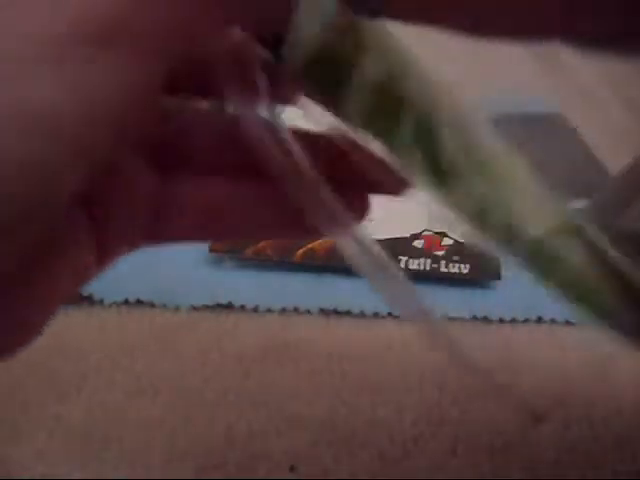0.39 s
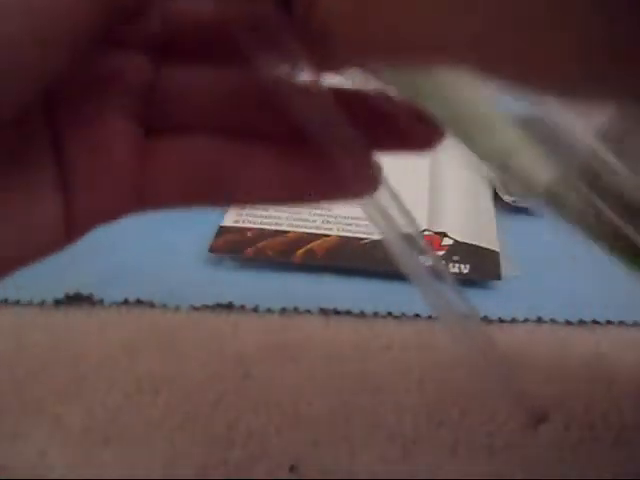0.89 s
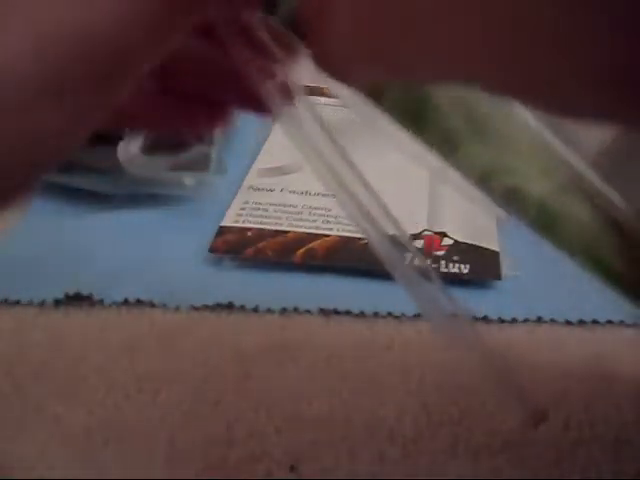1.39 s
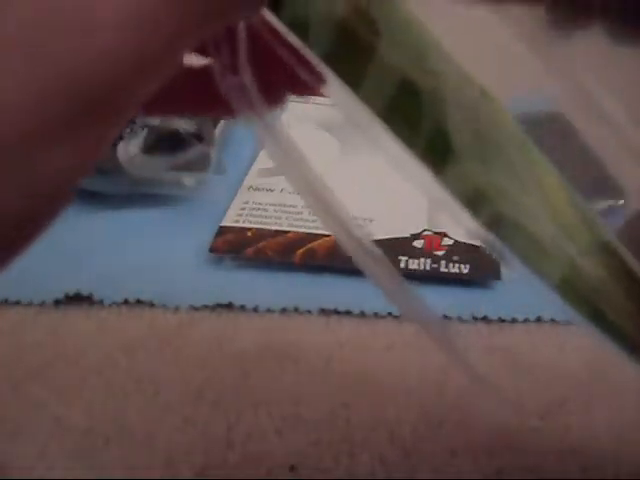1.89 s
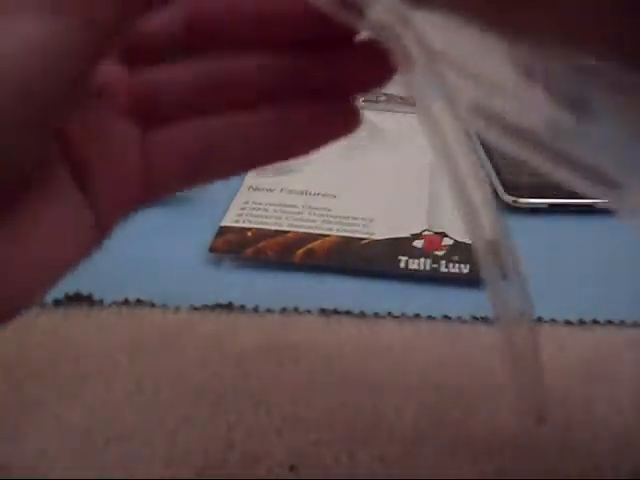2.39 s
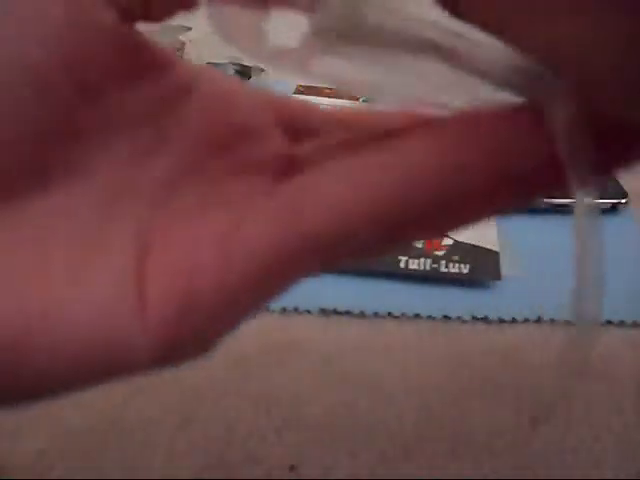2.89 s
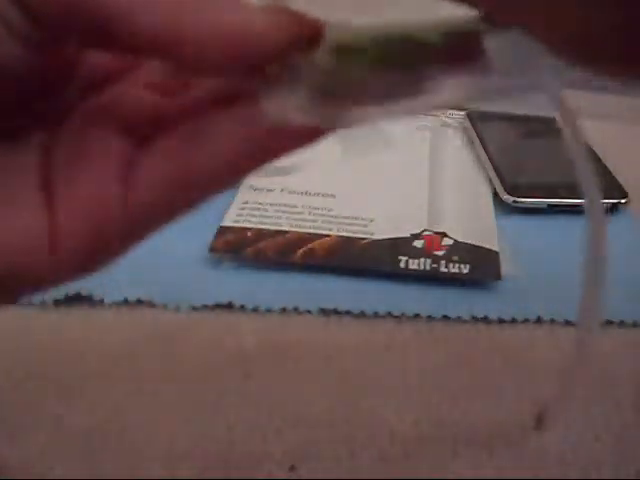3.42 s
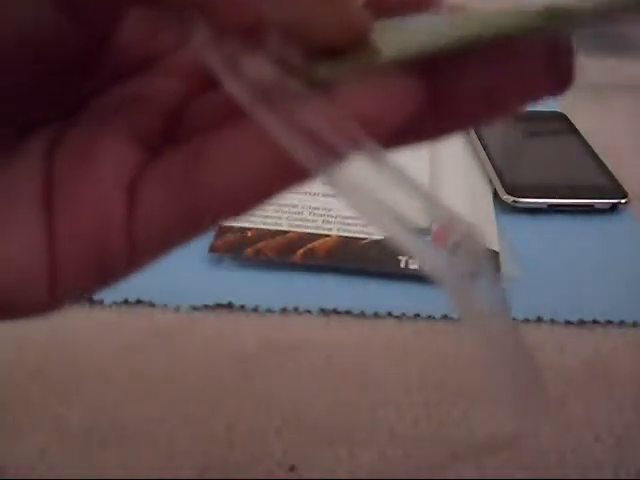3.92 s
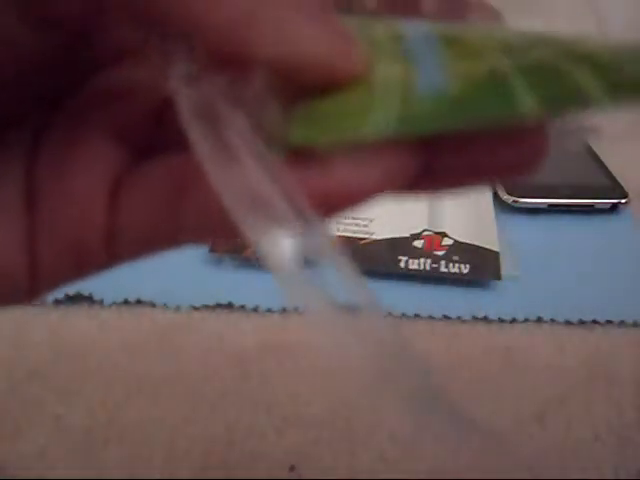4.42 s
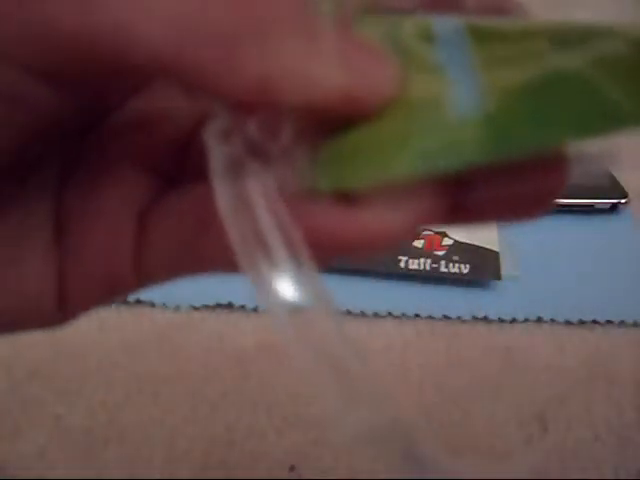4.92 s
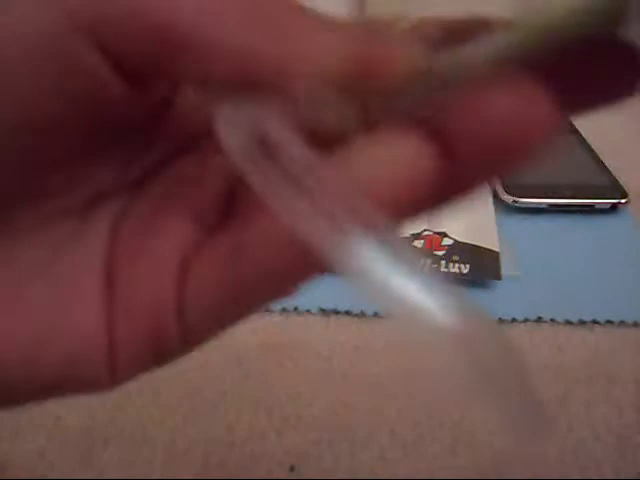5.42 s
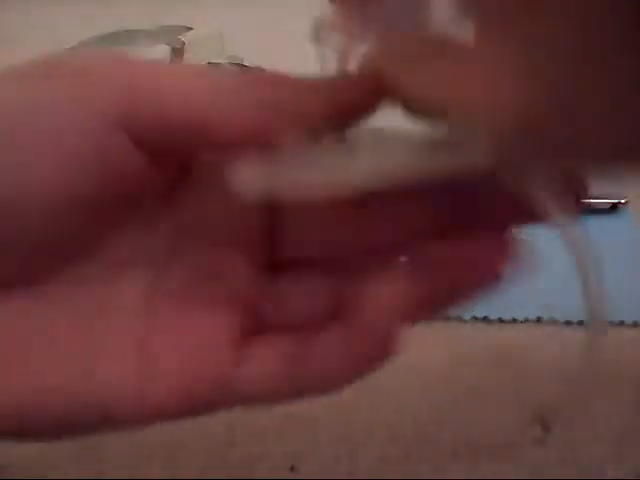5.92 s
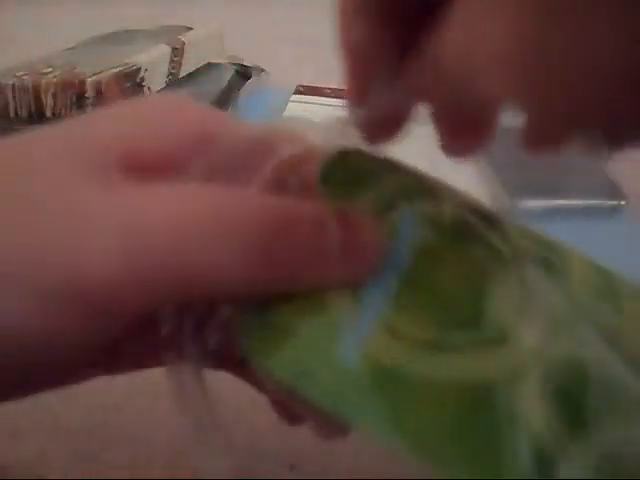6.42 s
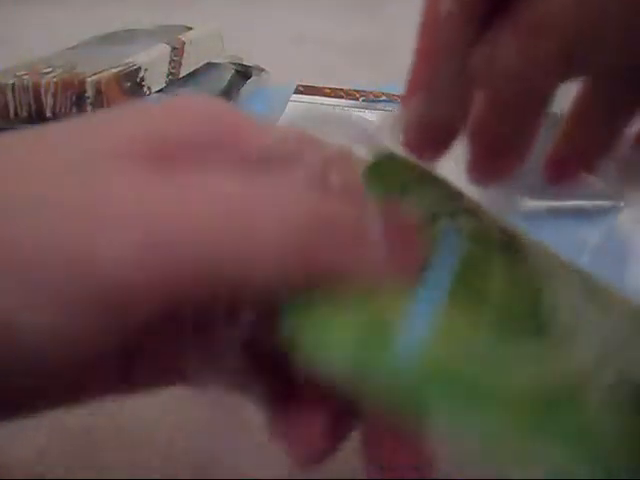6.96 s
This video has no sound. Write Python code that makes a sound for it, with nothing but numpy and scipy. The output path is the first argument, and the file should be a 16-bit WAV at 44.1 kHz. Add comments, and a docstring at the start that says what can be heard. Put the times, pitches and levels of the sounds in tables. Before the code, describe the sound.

Hard clear plastic packaging is bent and pulled apart by hand, very close to a cheap microphone in a small carpeted room. Light clicks and dull pops come in loose clusters with soft rustling, then crowd together. A tiny quickening creak leads to a loud snap near the end, followed by a short rattle, another strong pop and a few lesser ticks. Hiss, low rumble and a faint high whine stay beneath.

```python
"""Hands bend and pull apart a stiff clear plastic shell, close by in a quiet carpeted room.
The sheet buckles in clicks and dull pops, creaks, and snaps open: short jerks set its modes ringing.
Rustle, brief rubs and a rattle after the snap drive the same modes with small ticks; dying noise is the room.
Below lie the microphone's hiss and rumble (shaped noise) and a thin whine (sines in a narrow noise band).
Gain control ducks after loud peaks, most of all after the loud snap."""
import sys
import numpy as np
from scipy import signal
from scipy.fft import rfft, irfft
from scipy.io import wavfile
from scipy.ndimage import uniform_filter1d

SR = 44100
rng = np.random.default_rng(int(sys.argv[2]) if len(sys.argv) > 2 else 0)


def dump_mix(stems):
    """Bounce the given channels to the path in sys.argv[1] as a 16-bit WAV at rate SR."""
    frames = np.atleast_2d(stems).T  # one column per channel
    limited = np.clip(frames, -1, 1)  # hard clip at full scale
    pcm = np.round(limited * 32767).astype(np.int16)
    wavfile.write(sys.argv[1], SR, pcm)


def invert_db(x):
    """Field ratio 10**(x/20) for x, a level in decibels (scalar or array-like)."""
    u = np.asarray(x, float) / 20
    return 10 ** u


N = 311780


def rms_one(x):
    """Scales a signal to rms 1."""
    return x / np.sqrt(np.mean(x ** 2) + 1e-20)


# Colour of the noise of air and microphone. Each row: frequency in Hz, relative level in dB.
HISS_COLOUR = [(12, -24), (20, 5), (49, 0), (559, -15.5), (919, -19), (1440, -20), (5000, -25),
               (9000, -28.5), (10500, -28.5), (13700, -50.5), (22000, -120)]
# Whine of the electronics. Each row: frequency in Hz, rms level in dB ahead of the gain control.
WHINE_TONES = [(7643, -71.5), (7868, -73)]


def hiss():
    """Steady noise of air and microphone, with the electronics' whine as sines in a narrow noise band."""
    hz = np.maximum(np.fft.rfftfreq(N, 1 / SR), 1)
    colour_hz, colour_db = np.transpose(HISS_COLOUR)
    colour = invert_db(np.interp(np.log(hz), np.log(colour_hz), colour_db))
    out = invert_db(-52) * rms_one(irfft(rfft(rng.standard_normal(N)) * colour, N))
    centre_hz, width_hz = 7740, 330
    hump = np.exp(-2 * ((hz - centre_hz) / width_hz) ** 2)
    out += invert_db(-74) * rms_one(irfft(rfft(rng.standard_normal(N)) * hump, N))
    for tone_hz, db in WHINE_TONES:
        out += np.sqrt(2) * invert_db(db) * np.sin(2 * np.pi * tone_hz * np.arange(N) / SR)
    return out


def room(x):
    """Diffuse echoes: noise that dies away, faster in the treble."""
    level_db, gap_s, bass_db = -16, 0.0066, -6.5
    bass_t60_s, treble_t60_s = 0.26, 0.208
    t = np.arange(SR // 2) / SR
    noise = rng.standard_normal(len(t)) * (t > gap_s)
    low = signal.lfilter([.25], [1, -.75], noise)
    bass_tail = low * invert_db(bass_db - 60 * t / bass_t60_s)
    treble_tail = (noise - low) * invert_db(-60 * t / treble_t60_s)
    tail = bass_tail + treble_tail
    return invert_db(level_db) * signal.fftconvolve(x, tail / np.sqrt(np.sum(tail ** 2)))[:N]


def settling(column, level_db):
    """Power of the crinkle that dies away after each buckle, as the sheet settles."""
    decay_s, db_per_db = 0.01, 0.49   # a louder buckle crinkles on louder, by about half its dB
    rows = np.array(BUCKLE_EVENTS)
    kicks = np.zeros(N)
    kicks[(rows[:, 0] * SR).astype(int)] = invert_db(level_db + db_per_db * rows[:, column]) ** 2
    r = np.exp(-1 / (decay_s * SR))
    return signal.lfilter([1], [1, -r], kicks + 1e-18)


# Fingers rub and crinkle the sheet, levels gliding from row to row.
# Each row: time in seconds, relative dull rustle in dB, relative bright rustle in dB.
RUSTLE_LEVELS = [(0, -53.5, -64), (.15, -51, -73), (.3, -58, -75), (.5, -48, -65), (.9, -61.5, -64),
                 (1.45, -79, -89), (1.62, -67, -57), (1.8, -57, -76), (2.0, -59.5, -65), (2.2, -46.5, -55),
                 (2.5, -65.5, -70), (2.97, -49, -60), (3.4, -62.5, -79), (4.25, -54.5, -70),
                 (5.2, -56.5, -80), (5.64, -54, -55), (5.94, -47.5, -59), (6.42, -56, -59),
                 (7.07, -62.5, -64)]


def rustle():
    """Dense small ticks under sliding fingers, coming in clumps; one drive for each range."""
    ticks_per_s, clump_db = 5000, 4.4
    s, dull_db, bright_db = np.transpose(RUSTLE_LEVELS)
    t = np.arange(N) / SR
    smooth = uniform_filter1d(rng.standard_normal(N), size=400)
    clumps = rms_one(uniform_filter1d(smooth, size=400))
    born = rng.random(N) < ticks_per_s / SR
    ticks = rms_one(born * rng.standard_normal(N) * invert_db(clump_db * clumps))
    # dull crinkle follows the pop of each buckle, bright crinkle its crack
    dull_power = invert_db(np.interp(t, s, dull_db)) ** 2 + settling(column=3, level_db=-32)
    bright_power = invert_db(np.interp(t, s, bright_db)) ** 2 + settling(column=1, level_db=-37)
    dull, bright = ticks * np.sqrt(dull_power), ticks * np.sqrt(bright_power)
    # crack, thud, hollow pop, snap
    return [bright * invert_db(-23), dull * invert_db(-32.5), dull * invert_db(-28), bright * invert_db(-22.5)]


# Brief rubs over one dent, and the ringing rattle just after the loud snap (the row at 5400 Hz).
# Each row: start in seconds, length in seconds, relative level in dB, pitch in Hz.
RUBS_AND_RATTLE = [(0.368, 0.041, -60, 2000), (0.597, .05, -80, 2300), (1.55, 0.037, -57, 1230),
                   (1.646, 0.061, -65, 2320), (2.093, 0.12, -70, 1180), (2.922, 0.052, -73, 900),
                   (5.5, 0.039, -66, 3400), (5.613, 0.12, -62, 2600), (5.754, .03, -55, 3560),
                   (5.758, 0.028, -64, 820), (5.91, 0.055, -68, 885), (6.176, .07, -59.5, 1900),
                   (6.515, .09, -60, 5400), (6.445, 0.045, -72, 900), (5.3, 0.23, -82, 2000)]


def rubs_and_rattle(hz, grains):
    """Drive of one mode: grains that swell and fade, felt only near each row's pitch."""
    rise_share, width_octaves = .3, .2
    out = np.zeros(N)
    for s, length_s, db, pitch_hz in RUBS_AND_RATTLE:
        at, part = int(s * SR), np.linspace(0, 1, int(length_s * SR))
        swell = np.interp(part, [0, rise_share, 1], [0, 1, 0])
        near = np.exp(-(np.log2(hz / pitch_hz) / width_octaves) ** 2)
        out[at:at + len(part)] += invert_db(db) * near * swell * grains[at:at + len(part)]
    return out


# Two edges stick and slip past each other, quickening, then slowing.
# Each row: time in seconds, gap to the next slip in ms, relative level in dB.
CREAK_PATH = [(6.3736, 8.9, -43.5), (6.392, 7.2, -39), (6.416, 4.7, -36), (6.428, 4.7, -40.5),
              (6.436, 7.7, -36), (6.455, 8.4, -41.5)]
# A creak's slip is mostly crack. The entries: crack, thud, hollow pop and snap, each in dB on the level.
CREAK_BALANCE_DB = [0.5, -28.5, -11.5, -10]


def creak(count):
    """Stick-slip as rows like buckles, each slip timed by the gap after the one before."""
    s, gap_ms, db = np.transpose(CREAK_PATH)
    times = [s[0]]
    for _ in range(count - 1):
        times.append(times[-1] + np.interp(times[-1], s, gap_ms) / 1000)
    pitch_hz = 4500
    return [(t, *(np.interp(t, s, db) + np.array(CREAK_BALANCE_DB)), pitch_hz) for t in times]


def ring(push, hz, t60):
    """A damped resonance: a unit click sets a sine of height 1 ringing."""
    r, w = invert_db(-60 / (t60 * SR)), 2 * np.pi * hz / SR
    return signal.lfilter([0, np.sin(w)], [1, -2 * r * np.cos(w), r * r], push + 1e-18)


def slip(ms, chance, modes):
    """One buckle: a jerk among uneven smaller jerks that swell and die; with a gain for each mode."""
    t_s = np.arange(len(chance)) / SR
    age = t_s * 1000 / max(ms, .05)   # in slip lengths
    jerks = chance ** 3 * np.exp(-age) * np.minimum(age / 0.23, 1)
    jerks[int(np.argmax(age >= .3))] = 4.1
    grip = np.exp(-2j * np.pi * np.array(modes)[:, :1] * t_s) @ jerks   # spectrum at the modes
    # however the jerks fall, every mode takes up much its usual share
    power = np.abs(grip) ** 2
    return jerks, 1 / np.sqrt(0.51 * power + 0.22 * np.mean(power))


def near_dent_db(hz, dent_hz):
    """How well a dent of this pitch grips a mode: best right at its pitch, less and less above it."""
    above_db_per_octave, farthest_db, dent_db = 5.5, 14.5, -1
    peak_db, peak_width_octaves = 7.5, 0.18
    octaves = np.log2(hz / dent_hz)
    slope_db = min(max(above_db_per_octave * octaves, 0), farthest_db)
    return dent_db - slope_db + peak_db * np.exp(-(octaves / peak_width_octaves) ** 2)


# Buckles of the sheet. Each row: time in seconds, crack in dB, thud in dB, hollow pop in dB
# (all relative), pitch of the dent that gives way in Hz.
BUCKLE_EVENTS = [(0.0475, -53, -44.5, -45, 5120), (0.2538, -34.5, -48, -45, 3100),
                 (0.2566, -26.5, -32.5, -29.5, 1740), (0.3175, -43.5, -62, -53, 5000),
                 (0.3722, -26.5, -46, -42, 2040), (0.398, -39, -33.5, -34.5, 5100),
                 (0.4416, -34.5, -45, -35.5, 4120), (0.4538, -31, -35, -34, 2000),
                 (0.481, -46, -42, -45, 1340), (0.6044, -35, -68, -56, 2550),
                 (1.2494, -52.5, -61.0, -50.5, 5490), (1.4658, -46, -51, -46.5, 5100),
                 (1.547, -43, -62, -46.5, 1890), (1.5679, -35, -46.5, -48, 1330),
                 (1.6104, -33, -44.5, -52, 1340), (1.6824, -31.5, -67, -52, 2260),
                 (1.697, -34, -56, -52.5, 1950), (1.718, -30.5, -49, -48.5, 2020),
                 (1.917, -13, -33, -28, 1210), (2.0276, -42.5, -61.0, -47, 4100),
                 (2.1958, -37, -45, -59, 1710), (2.219, -50.5, -30.5, -35.5, 1310),
                 (2.4182, -60, -45.5, -43, 5490), (2.7787, -39, -33.5, -38.5, 3580),
                 (2.857, -40.5, -44, -41.5, 2300), (2.9451, -38, -43, -49, 1310),
                 (2.9567, -58, -49.5, -38.5, 1310), (3.1013, -38.5, -46, -63, 4700),
                 (3.3403, -48.5, -42.5, -66, 1340), (3.4161, -38.5, -47.5, -49, 3930),
                 (3.4247, -44, -62, -56, 5430), (3.4562, -23.5, -56, -48.5, 4230),
                 (3.6508, -24, -48, -43, 6840), (3.678, -39.5, -45, -46.5, 1980),
                 (4.0268, -59, -48.5, -57, 2910), (4.2276, -30.5, -65, -48, 1230),
                 (4.572, -54, -46, -46, 2990), (4.7474, -48, -51, -44, 3400),
                 (4.797, -40.5, -65, -50, 1830), (4.86, -43.5, -46, -48, 1890),
                 (4.918, -50, -57, -47.5, 1460), (5.01, -38.5, -58.0, -54, 1290),
                 (5.028, -35, -42, -41, 1770), (5.104, -34.5, -46, -47.5, 1610),
                 (5.1134, -29.5, -48.0, -33.5, 3520), (5.187, -34.5, -55, -37, 1290),
                 (5.195, -34.5, -42, -43, 1740), (5.2098, -38, -62, -54, 2950),
                 (5.226, -39, -56, -51, 3080), (5.27, -34, -45, -51, 1320),
                 (5.285, -40.5, -48, -46.5, 1640), (5.3119, -29.5, -42, -31, 1590),
                 (5.375, -36, -53, -35.5, 1520), (5.4243, -33.5, -52, -44.5, 1300),
                 (5.4549, -22, -39, -33, 3170), (5.478, -31.5, -48, -41, 2780),
                 (5.5392, -36.5, -41, -40, 3300), (5.581, -52, -47, -53, 2410),
                 (5.6198, -51, -46, -45.5, 2200), (5.6736, -35.5, -61, -44.5, 4230),
                 (5.687, -44.5, -61.0, -65.5, 4220), (5.764, -36, -48, -41, 3560),
                 (5.7774, -42, -62, -46, 1850), (5.8528, -43.5, -61.0, -52, 3120),
                 (5.93, -44, -44, -43, 4300), (5.9464, -58, -47.5, -52.5, 7860),
                 (6.001, -37, -38.5, -38, 4500), (6.1165, -40, -53, -60, 3570),
                 (6.1767, -38.5, -44.0, -41.5, 1660), (6.1893, -18.5, -53, -37, 4100),
                 (6.1992, -33.5, -40, -35, 2000), (6.2133, -15.5, -52, -45.5, 2000),
                 (6.2401, -39, -44, -43, 3010), (6.48, -37.5, -54, -47, 1940),
                 (6.5088, -2, -23.5, -12.5, 5490), (6.5214, -29.5, -33, -45.5, 5330),
                 (6.6041, -14, -21, -15.5, 1770), (6.6216, -41, -44, -55, 5150),
                 (6.6842, -40.5, -48, -39, 5450), (6.7804, -33.5, -55.5, -36, 1310),
                 (6.7991, -42, -63, -54, 5400), (6.8058, -34.5, -53, -41, 1980),
                 (6.8623, -30.5, -48, -35.5, 2110), (6.8774, -42, -38.5, -39.5, 2090),
                 (6.9154, -54, -48.0, -42.5, 1680), (6.9449, -33.5, -45, -35, 1260),
                 (7.014, -43.5, -58, -40, 1320), (7.0296, -47.5, -60, -47, 1310)]
# What the sheet rings with, in four ranges: crack, thud, hollow pop, snap.
# Each row of a range: frequency in Hz, relative level in dB, time to fall by 60 dB in seconds.
SHEET_MODES = [
    [(3620, -11, 0.014), (4017, -8.5, 0.011), (4890, 0.5, 0.0026), (5300, -10, 0.016), (5560, -9.5, 0.0084),
     (6580, -13.5, 0.015), (7200, -14, 0.022), (8860, -4.5, 0.0077), (9800, -11.5, 0.011)],
    [(60, -16, 0.04), (126, -1.5, 0.031), (200, 2.5, 0.024), (267, 4, 0.034), (323, 4, 0.029),
     (449, 1.5, 0.018)],
    [(553, -2, 0.023), (687, 7.5, 0.0095), (833, 6, 0.021), (936, 5.5, 0.017), (1131, 3.5, 0.0064)],
    [(1400, 3, 0.0039), (1686, -3, 0.019), (1862, -1, 0.011), (2402, -3, 0.011), (2476, -8.5, 0.029),
     (3040, 0.5, 0.0076)],
]
# Fixed part of each range's delay after the buckle's time. One entry a range, in ms.
START_MS = [0.94, 0.21, 0.38, 0.7]
# The slower ranges also wait for a share of the slip. One entry a range, as a ratio to its length.
WAIT_SHARE = [0.0068, 0.52, 0.519, 0.11]
# The crack is over first, the bending of the whole sheet lasts longest.
# One entry a range, as a ratio to the slip's length.
LENGTH_SHARE = [0.22, 2.8, 1.8, .55]


def sheet(uneven_db):
    """Every buckle, slip and tick drives the same modes; each buckle grips them with other strengths."""
    snap_db = -10.5   # the snap range against the crack range
    slip_ms, slip_spread, sharper_per_db = 1.9, .2, .015   # spread and sharpening in log length
    creak_slip_ms, creak_uneven_db = 0.39, 2
    jerk_samples, grains_per_s = 2048, 8000
    buckles = [(s, crack, thud, pop, crack + snap_db, hz) for s, crack, thud, pop, hz in BUCKLE_EVENTS]
    slides = creak(count=14)
    rows = buckles + slides
    # random numbers of each row: its jerks, then its grip on each mode, and last its length
    chance = rng.standard_normal((len(rows), jerk_samples + 32))
    # the more the crack stands above the pop, the shorter the slip
    sharp_db = np.array([crack - pop for _, crack, _, pop, _ in BUCKLE_EVENTS])
    log_length = slip_spread * chance[:len(buckles), -1] - sharper_per_db * sharp_db
    lengths = list(slip_ms * np.exp(log_length)) + [creak_slip_ms] * len(slides)
    uneven = [uneven_db] * len(buckles) + [creak_uneven_db] * len(slides)
    grains = rms_one(rng.standard_normal(N) * (rng.random(N) < grains_per_s / SR))
    out, number = np.zeros(N), 0
    for k, (modes, ticks) in enumerate(zip(SHEET_MODES, rustle())):
        slips = [slip(ms * LENGTH_SHARE[k], c[:jerk_samples], modes) for ms, c in zip(lengths, chance)]
        for m, (hz, level_db, t60) in enumerate(modes):
            push = np.append(ticks + rubs_and_rattle(hz, grains), np.zeros(4096))
            for row, (jerks, share), c, spread_db, ms in zip(rows, slips, chance, uneven, lengths):
                at = round((row[0] + (START_MS[k] + WAIT_SHARE[k] * ms) / 1000) * SR)
                # only crack and snap follow the dent's pitch
                tilt_db = near_dent_db(hz, row[5]) if k in (0, 3) else 0
                grip_db = spread_db * np.tanh(c[jerk_samples + number])
                push[at:at + jerk_samples] += invert_db(row[1 + k] + tilt_db + grip_db) * share[m] * jerks
            # neighbouring modes ring with opposite sign
            out += (-1) ** number * invert_db(level_db) * ring(push[:N], hz, t60)
            number += 1
    return out


def scene():
    """The sheet, its echoes and the steady floor."""
    plastic = sheet(uneven_db=3.5)
    return (plastic + room(plastic) + hiss())[None]


def band_limit(x):
    """A steep low-pass at the top of the band."""
    return signal.sosfilt(signal.butter(12, 10680, fs=SR, output="sos"), x)


def record(dry):
    """Gain sinks after a loud peak and creeps back; the top is cut; peaks clip."""
    duck_above_db, duck_db_per_db, recover_db_per_s, lag_s = -19, 0.23, 1, 0.004
    level_db = 20 * np.log10(np.abs(dry[0]) + 1e-9)
    over_db = duck_db_per_db * np.maximum(level_db - duck_above_db, 0)
    # a held maximum that sinks at the recovery rate
    creep = recover_db_per_s * np.arange(N) / SR
    duck_db = np.maximum.accumulate(over_db + creep) - creep
    r = np.exp(-1 / (lag_s * SR))
    ducked = dry * invert_db(-signal.lfilter([1 - r], [1, -r], duck_db))
    top_cut = signal.cheby2(12, 50, 11440, fs=SR, output="sos")   # 50 dB down from 11440 Hz
    mix = np.clip(signal.sosfilt(top_cut, ducked), -1, 1)
    return band_limit(mix)


dry = scene()
out = record(dry)
dump_mix(out)
```